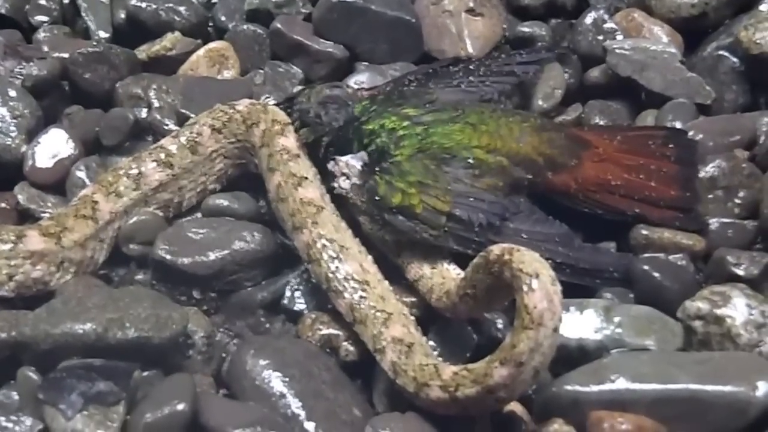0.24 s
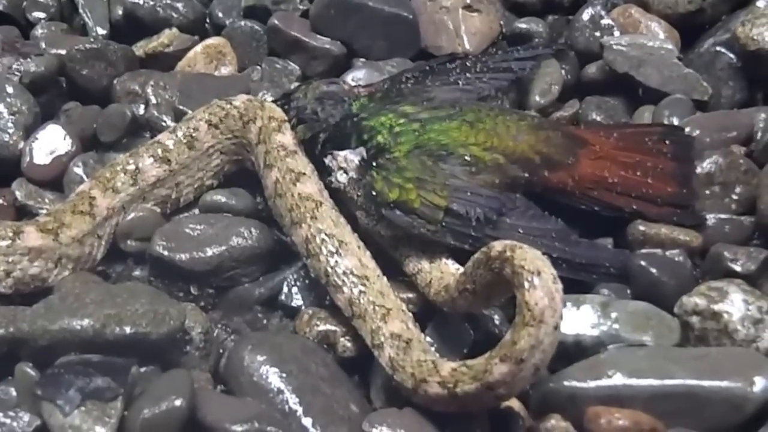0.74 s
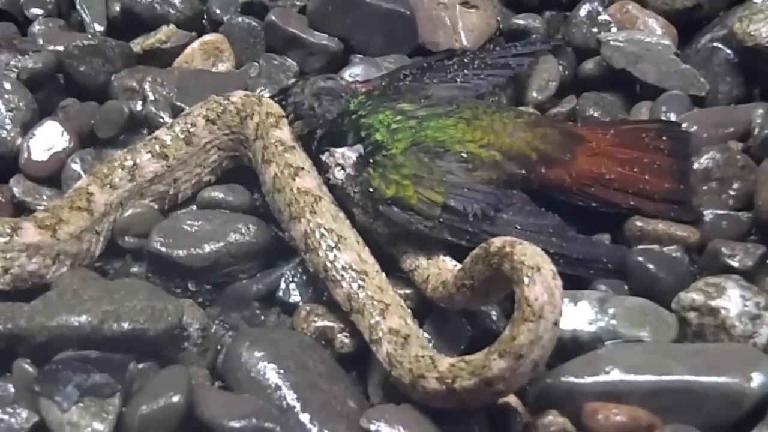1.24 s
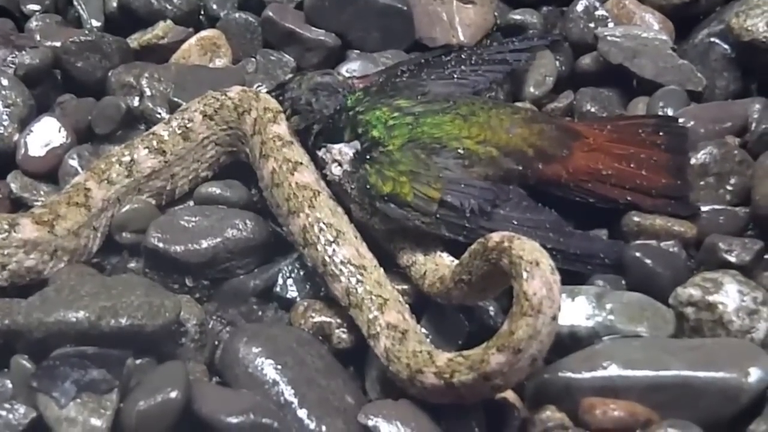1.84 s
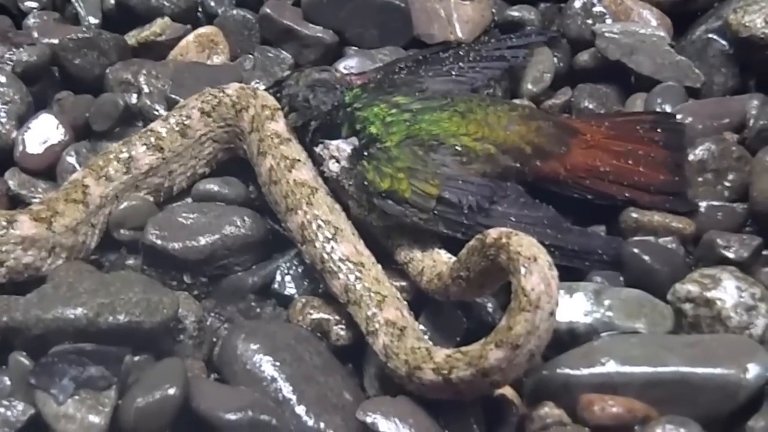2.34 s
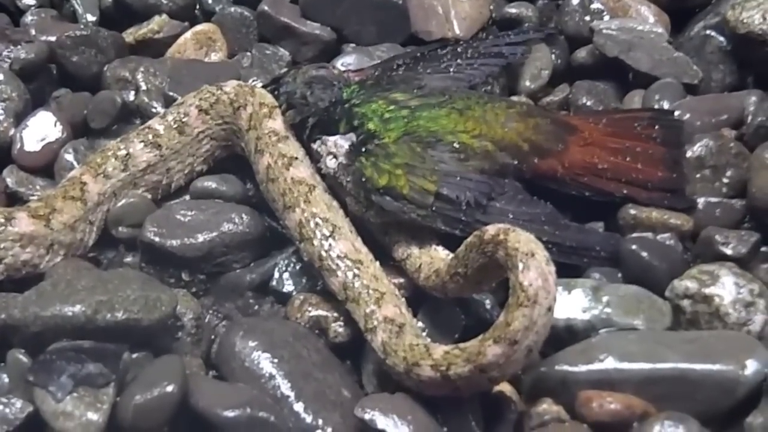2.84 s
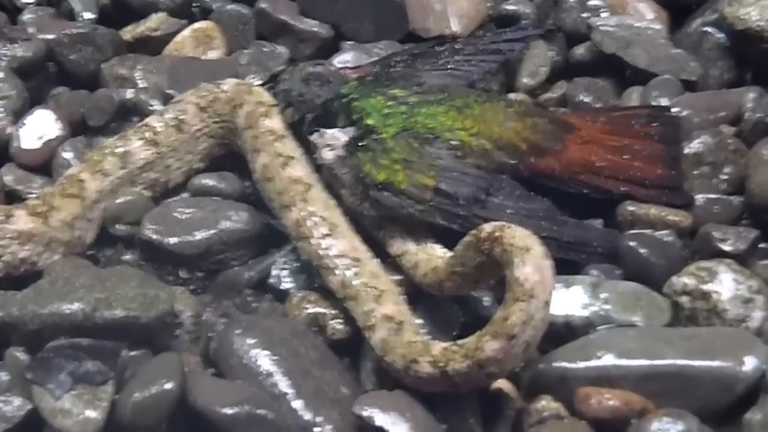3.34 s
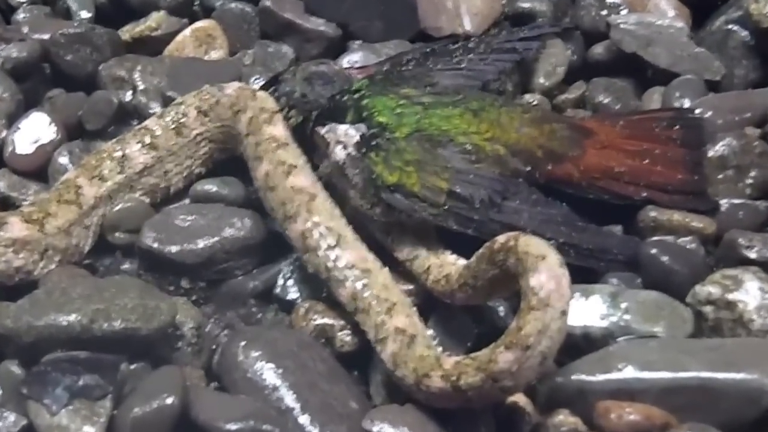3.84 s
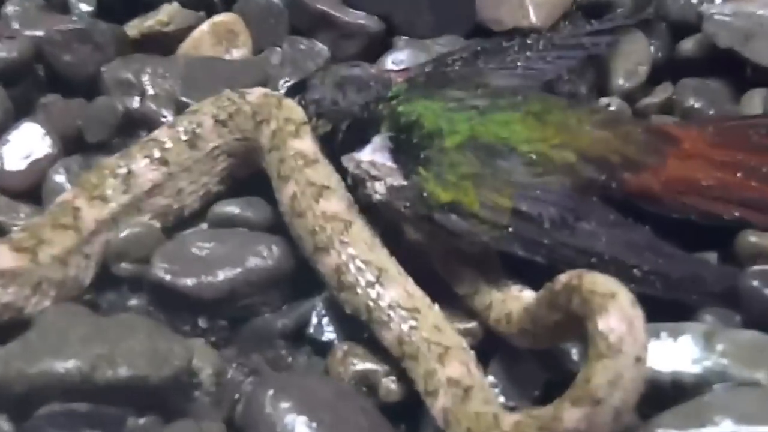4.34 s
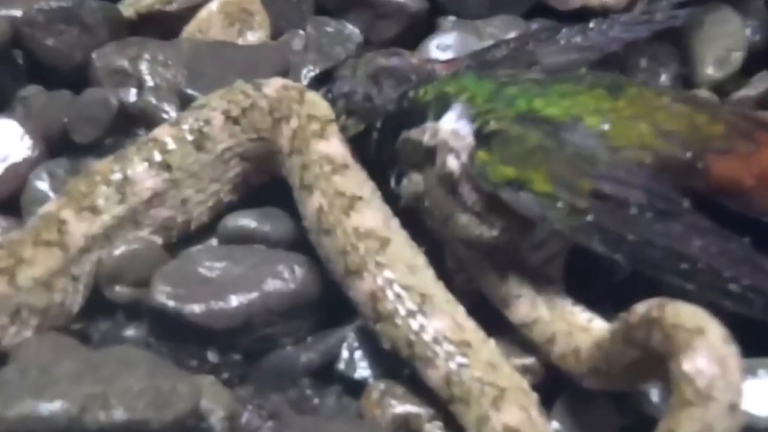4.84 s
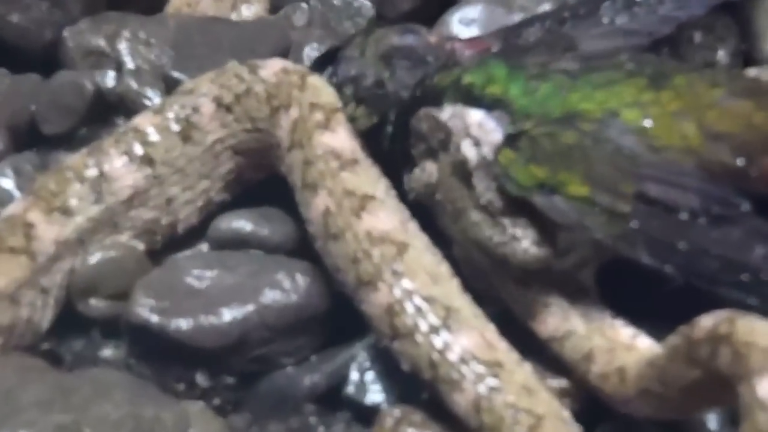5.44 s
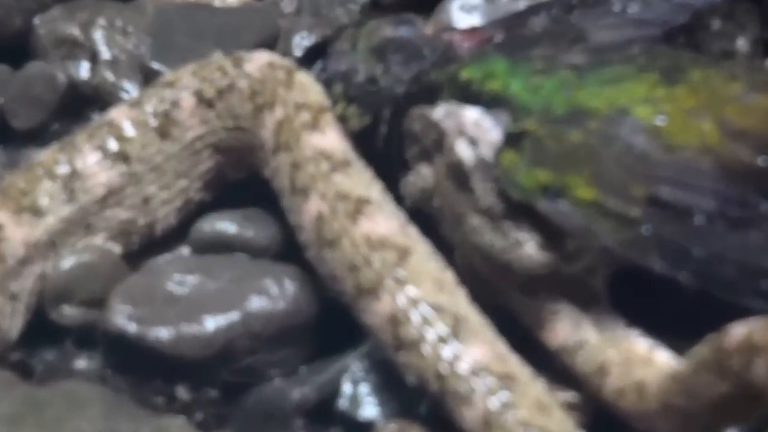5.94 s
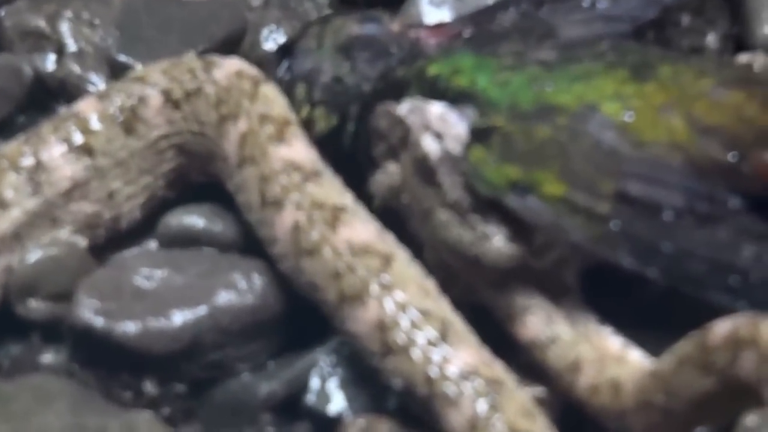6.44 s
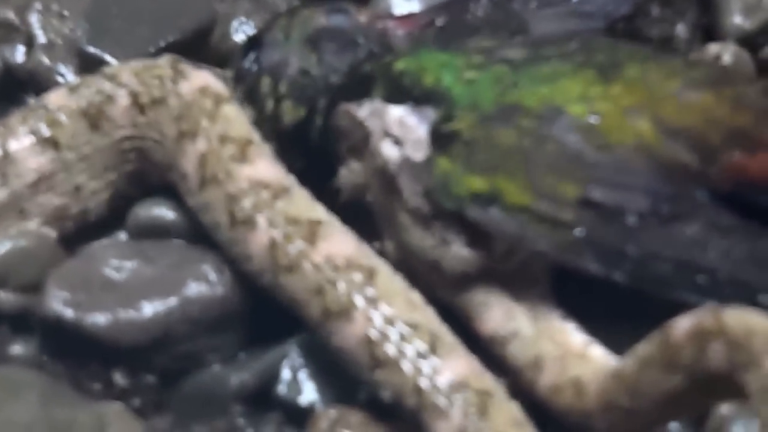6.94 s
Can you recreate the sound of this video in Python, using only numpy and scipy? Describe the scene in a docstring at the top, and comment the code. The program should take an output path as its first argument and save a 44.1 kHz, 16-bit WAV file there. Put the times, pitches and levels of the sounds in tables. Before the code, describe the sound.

On a wet jungle floor of dark pebbles, far insects and water merge into a steady, shrill, hissy drone. Drops tick on stones, thud softly on leaves and fizz into tiny sprays. A bird chirps faintly at the start; near the end one loud drop splats close by, then a clearer run of paired chirps follows. Small microphone, mono, thin and peaky.

```python
"""Wet tropical forest floor

Far insects and water blur into one rush of noise, which the port of a small camera's microphone turns
into a high drone near 3 kHz. Drops thud on leaves, tick on stones and burst into spray: damped tones and
short noise. A far bird whistles pairs of rising chirps, a faint low sine hum comes and goes, and soft
bumps of the camera are low tones that die within a few cycles."""
import sys
import numpy as np
from scipy import signal
from scipy.fft import rfft, irfft, next_fast_len
from scipy.io import wavfile
from scipy.ndimage import uniform_filter1d, map_coordinates

SR = 44100
rng = np.random.default_rng(int(sys.argv[2]) if len(sys.argv) > 2 else 0)


def int16_out(signal):
    """Quantize to a 16-bit WAV file."""
    q = np.round(np.clip(np.atleast_2d(signal).T, -1, 1) * 32767)
    wavfile.write(sys.argv[1], SR, q.astype(np.int16))


N = 317079


def amp(db):
    """Decibels to gain."""
    return 10 ** (np.asarray(db) / 20)


def unit(x):
    """Scaled to rms 1."""
    return x / np.sqrt(np.mean(x ** 2) + 1e-20)


def wobble(rate):
    """A smooth random curve with rate knots a second."""
    knots = rng.standard_normal(int(N * rate / SR) + 4)
    return map_coordinates(knots, [np.arange(N) * rate / SR])


def filtered(x, response):
    """x shaped by a response of frequency in Hz."""
    m = next_fast_len(x.shape[-1] + 4096)  # silence after the sound gives the filter room to ring
    spectrum = rfft(x, m) * response(np.fft.rfftfreq(m, 1 / SR))
    return irfft(spectrum, m)[..., :x.shape[-1]]


def port(f):
    """Air resonances of the microphone port: flat bass, a peak at each with a notch between, falling above."""
    # air modes: (frequency [Hz], width [Hz], strength [dB])
    air_modes = [(3174, 270, 0.5), (4450, 344, -19.5)]
    modes = [amp(db) * c * c / (c * c - f * f + 1j * f * width) for c, width, db in air_modes]
    return sum(modes) / sum(amp(db) for c, width, db in air_modes)


def add(track, s, db, sound):
    """Mixes in a short sound at time s, so that it alone peaks at db behind the port."""
    start = round(s * SR)
    track[start:start + len(sound)] += amp(db) * sound / np.abs(filtered(sound, port)).max()


def scatter(sound, t60, gap):
    """The answer of leaves and trunks around: a dying cloud of copies of total energy 1, after a gap in s."""
    t = np.arange(len(sound)) / SR
    tail = rng.standard_normal(len(t)) * amp(-60 * t / t60) * (t > gap)
    return signal.fftconvolve(sound, tail / np.linalg.norm(tail))[:len(t)]


def ping(t, hz, rise, t60, crackle):
    """A damped tone with a soft onset; the contact crackles, which widens it."""
    rough = 1 + crackle * rng.standard_normal(len(t))
    envelope = (1 - np.exp(-t / rise)) * amp(-60 * t / t60)
    return np.sin(2 * np.pi * hz * t) * rough * envelope


def rush(level_db=-43, drift_db=0.38, flutter_db=0.54, patchy_db=1.11):
    """Countless far insects and drips as shaped noise, with soft patches of more and less."""
    # tone colour of the forest: (frequency [Hz], relative level per Hz [dB])
    forest_colour = [(15, -4), (60, -3), (150, 3.5), (400, 0.5), (1000, 0.5), (2000, -1), (3200, -4.5),
                     (4200, -6), (5000, -6), (7000, -10), (15000, -4)]
    f, colour_db = np.transpose(forest_colour)
    z = signal.stft(rng.standard_normal(N), nperseg=512)[2]
    # random gains, smoothed over frequency and then over time
    patches = uniform_filter1d(rng.standard_normal(z.shape), size=12, axis=0)
    patches = uniform_filter1d(patches, size=8, axis=1)
    noise = signal.istft(z * amp(patchy_db * unit(patches)), nperseg=512)[1][:N]
    noise = filtered(noise, lambda hz: amp(np.interp(np.log(hz + 1), np.log(f), colour_db)))
    # level_db is the mean level of the 200-2000 Hz band ahead of the port
    low = filtered(noise, lambda hz: (hz > 200) & (hz < 2000))
    level = level_db + drift_db * wobble(1.22) + flutter_db * wobble(11)
    return amp(level) * noise / low.std()


def patter(count=450, level_db=-48, spread_db=3.0):
    """Many small drops farther off: damped tones of a few cycles, mostly faint."""
    track, t = np.zeros(N + 400), np.arange(400) / SR
    for when, pitch, rank in rng.random((count, 3)):
        hz = 600 * 16 ** pitch
        drop = np.sin(2 * np.pi * hz * t) * np.exp(-t * hz / 1.3)
        # higher drops are a little louder; only the few of low rank stand out
        db = level_db + 1.6 * np.log2(hz / 3000) - spread_db * np.log(rank + 0.0164)
        track[int(when * N):][:len(t)] += amp(db) * drop
    return track[:N]


def hum(centre_hz=57.2, waver_hz=1.2, waver_db=2):
    """A faint low sine whose pitch and level waver."""
    # the hum coming and going: (time [s], mean rms level [dB])
    hum_fades = [(0, -58), (.8, -53), (1.1, -51.5), (2.44, -51), (2.84, -59.5), (3.46, -52), (3.65, -58.5),
                 (4.0, -54), (5.87, -57.5), (7.1, -50.5), (7.19, -58)]
    times, levels = np.transpose(hum_fades)
    hz = centre_hz + waver_hz * wobble(2.54)
    db = np.interp(np.arange(N) / SR, times, levels) + waver_db * wobble(9)
    return np.sqrt(2) * amp(db) * np.sin(2 * np.pi * np.cumsum(hz) / SR)


def bird(climb_hz=576, sung_share=0.85, second_hz=-24.5, second_db=-1.5):
    """Hoarse whistles rise fast and level off; from afar the echoes outweigh the direct sound."""
    # pairs of chirps: (time [s], first to second [s], top pitch [Hz], peak level [dB])
    chirp_pairs = [(.172, 0.081, 4430, -38), (.46, .09, 4480, -37), (5.945, .063, 3830, -27),
                   (6.161, 0.077, 4000, -27), (6.4, .081, 4125, -29), (6.678, 0.066, 4226, -29.5),
                   (6.934, 0.069, 4277, -30)]
    # a lower chirp ahead of two late pairs: (time [s], top pitch [Hz], peak level [dB])
    lead_ins = [(6.635, 3830, -27), (6.893, 3850, -31)]
    track = np.zeros(N + SR)
    chirps = [(s, 0.052, hz, db) for s, hz, db in lead_ins]  # each lasts 52 ms
    for s, gap, hz, db in chirp_pairs:
        length = sung_share * gap  # the rest of the spacing is left unsung
        chirps.append((s, length, hz, db))
        chirps.append((s + gap, length, hz + second_hz, db + second_db))
    for s, length, top_hz, db in chirps:
        u = np.linspace(0, 1, round(length * SR))
        hz = top_hz - climb_hz * (1 - np.sin(u * np.pi / 2))
        # a random pitch jitter of 70 Hz rms makes the voice hoarse
        hz += 70 * unit(uniform_filter1d(rng.standard_normal(len(u)), size=90))
        swell = np.sin(np.pi * u ** 0.65) ** 0.5
        whistle = np.sin(2 * np.pi * np.cumsum(hz) / SR) * swell
        whistle = np.pad(whistle, (0, SR // 2 - len(u)))  # room for the echoes
        direct = amp(-4) * whistle
        add(track, s, db, direct + scatter(whistle, t60=0.24, gap=0.002))
    return track[:N]


def leaf_thuds(ring_t60=0.015, slap_t60=0.008, echo_db=-7):
    """Drops set broad leaves ringing briefly, with a slap of noise and a short scattered echo."""
    # (time [s], peak level [dB], brightness [dB per octave], slap against the ring's scale [dB])
    leaf_drops = [(0.224, -22.5, -1.5, -12.5), (0.583, -16, 1.5, -7), (1.048, -28, -4, -17),
                  (1.522, -20, -4, -19), (1.655, -15, -1, -9), (3.208, -26, 5, -20), (3.8625, -17, 11, 5),
                  (4.212, -13, 2, -2), (4.318, -26, 4.5, -20), (5.293, -15.5, -2.5, -14),
                  (5.327, -21, 0, -15), (5.334, -24, 1, -17), (6.055, -24, 2, -15), (6.552, -15, -0.5, -17),
                  (6.685, -21.5, 2.5, -18)]
    # modes of a leaf: (frequency [Hz], relative level [dB])
    leaf_modes = [(560, -5.5), (740, -3), (930, -7.5), (1330, -9.5), (2200, -12.5)]
    track, t = np.zeros(N + 4096), np.arange(4096) / SR
    for s, db, bright_db, slap_db in leaf_drops:
        ring = 0
        for k, (hz, level) in enumerate(leaf_modes):
            mode_db = level + bright_db * np.log2(hz / 700) + rng.normal(0, 2.5)
            # neighbouring modes start in opposite directions, so little deep bass is left
            ring = ring + (-1) ** k * amp(mode_db) * np.sin(2 * np.pi * hz * t)
        ring = ring * (1 - np.exp(-t / 0.00018)) * amp(-60 * t / ring_t60)
        slap = amp(slap_db - 60 * t / slap_t60) * rng.standard_normal(len(t))
        thud = ring + slap
        add(track, s, db, thud + amp(echo_db) * scatter(thud, t60=0.1, gap=0.00432))
    return track[:N]


def pebble_ticks(t60_at_3khz=0.0079, shortening=0.3):
    """Drops on pebbles and puddles: crackling damped tones, shorter the higher they are."""
    # (time [s], pitch [Hz], peak level [dB])
    pebble_drops = [(0.226, 3450, -18.5), (.305, 1430, -26), (0.342, 4880, -17), (.467, 1310, -25.5),
                    (.614, 4750, -20), (1.311, 1400, -19.5), (1.463, 3130, -20), (1.6238, 3004, -17.5),
                    (1.822, 4970, -24.5), (2.6777, 3260, -23), (3.225, 2922, -12), (3.3281, 3080, -17),
                    (3.6267, 2960, -20), (3.916, 3170, -19.5), (4.1585, 3466, -15.5), (4.2128, 1940, -15),
                    (4.2147, 3100, -12), (5.0713, 3200, -13.5), (5.114, 2450, -18), (5.2942, 3130, -17),
                    (5.8928, 3300, -15), (6.1673, 3192, -19.5), (6.552, 2820, -15), (6.6394, 3530, -19),
                    (6.7, 2215, -24), (7.0352, 3310, -19.5)]
    track, t = np.zeros(N + 4096), np.arange(4096) / SR
    for s, hz, db in pebble_drops:
        t60 = t60_at_3khz * (3000 / hz) ** shortening
        add(track, s, db, ping(t, hz, rise=0.00034, t60=t60, crackle=0.82))
    return track[:N]


def spray(crest_s=0.00135, smear=0.2):
    """Drops bursting into droplets: bands of noise that swell and die within milliseconds."""
    # (time [s], peak level [dB], centre [Hz])
    spray_bursts = [(0.3415, -30, 5100), (0.5054, -28.5, 8440), (0.583, -34, 5200), (0.879, -39, 9600),
                    (1.2983, -34, 6600), (1.478, -32, 6600), (2.117, -35, 6300), (2.6869, -34.5, 5400),
                    (3.2245, -34, 7800), (3.3189, -37.5, 5900), (3.3973, -33.5, 9600), (3.626, -26, 7350),
                    (3.8628, -39, 5300), (4.2122, -37, 6400), (4.2293, -22, 7700), (4.232, -34, 7000),
                    (4.7066, -26.5, 9700), (5.029, -34, 6130), (5.0709, -34, 5800), (5.115, -34.5, 5300),
                    (5.1746, -39, 9700), (5.296, -33, 6200), (5.724, -39, 7400), (5.8966, -13, 6600),
                    (5.9186, -42.5, 5100), (6.3146, -37, 5900), (6.3597, -37.5, 5500), (6.4133, -27, 9300),
                    (6.444, -28, 6500), (6.5514, -36, 6300), (6.6499, -34.5, 5000), (6.6848, -32.5, 6000),
                    (6.745, -35, 9000)]
    track, t = np.zeros(N + 4096), np.arange(4096) / SR
    for s, db, centre_hz in spray_bursts:
        def band(hz):
            octaves = np.log2((hz + 1) / centre_hz)
            fine = 0.5 * (hz / 12000) ** 2  # the finest droplets hiss up to the top
            return (np.exp(-1.2 * octaves ** 2) + fine) * (hz > 4400)
        # crest_s is the time to the crest at -29 dB; fainter, farther bursts last longer (dB per dB)
        u = 2 * t / (crest_s * amp(smear * (-29 - db)))
        add(track, s, db, filtered(rng.standard_normal(len(t)), band) * u ** 2 * np.exp(-u))
    return track[:N]


def bumps(cycles=3.4):
    """Dull pushes, as of a hand shifting on the camera: low tones that fall 60 dB in a few cycles."""
    # (time [s], pitch [Hz], peak level [dB])
    soft_bumps = [(3.271, 200, -32), (3.454, 60, -33.5), (3.803, 90, -33.5), (4.031, 35, -41),
                  (5.265, 132, -31.5)]
    track, t = np.zeros(N + 8192), np.arange(8192) / SR
    for s, hz, db in soft_bumps:
        add(track, s, db, np.sin(2 * np.pi * hz * t) * amp(-60 * t * hz / cycles))
    return track[:N]


def stone_splats():
    """A heavy drop on a near stone, and its rebound: damped stone modes that build up softly."""
    # drop and rebound: (time [s], peak level [dB])
    heavy_drops = [(5.8967, -2.5), (5.9187, -18.5)]
    # modes of the stone: (frequency [Hz], relative level behind the port [dB], t60 [s])
    stone_modes = [(3030, 2, .007), (3982, -1, 0.0061), (5400, -15, 0.0063), (6160, -22, .006)]
    track, t = np.zeros(N + 4096), np.arange(4096) / SR
    for s, db in heavy_drops:
        splat = 0
        for hz, level, t60 in stone_modes:
            gain = amp(level) / abs(port(hz))
            # the factor t softens the build-up further
            splat = splat + gain * ping(t, hz, rise=0.0026, t60=t60, crackle=0.15) * t
        add(track, s, db, splat)
    return track[:N]


def scene():
    """Everything that reaches the microphone, as one channel."""
    background = rush() + patter() + hum()
    drops = leaf_thuds() + pebble_ticks() + spray() + stone_splats()
    return (background + bird() + drops + bumps())[None]


def record(dry, hiss_db=-59.5, unsteady_db=0.73, top_hz=14280):
    """The port colours the sound, the circuit adds a slightly unsteady hiss, nothing stays above top_hz."""
    hiss = amp(hiss_db + unsteady_db * wobble(5.8)) * rng.standard_normal(dry.shape)
    wet = filtered(dry, port) + hiss
    return filtered(wet, lambda hz: hz < top_hz)


dry = scene()
out = record(dry)
int16_out(out)
```